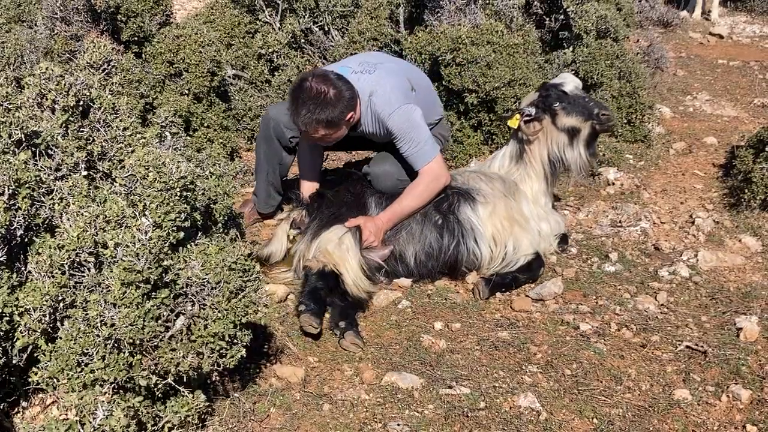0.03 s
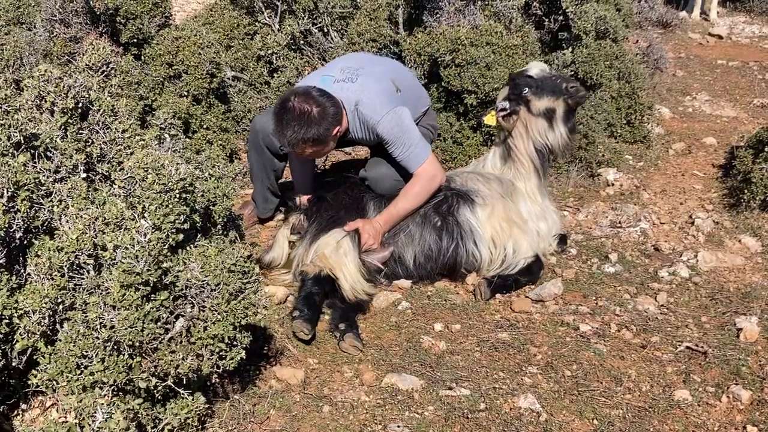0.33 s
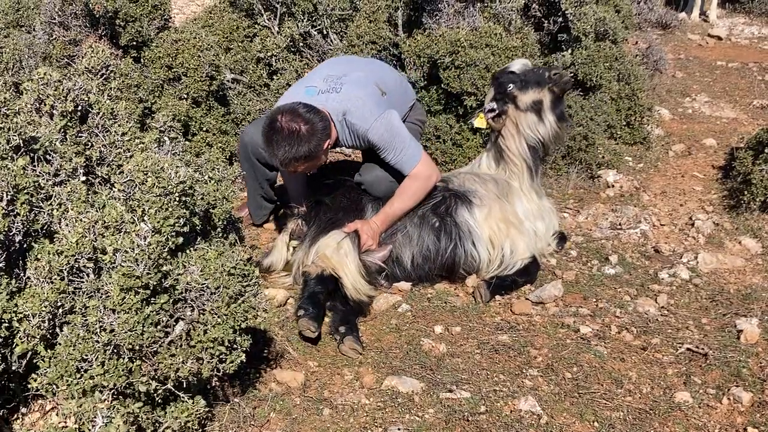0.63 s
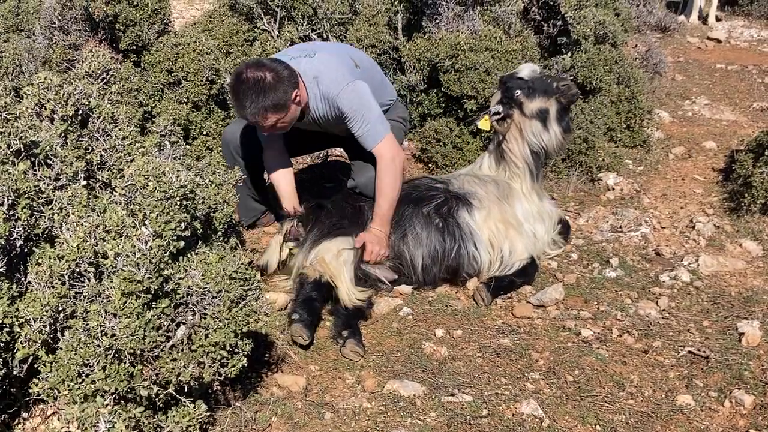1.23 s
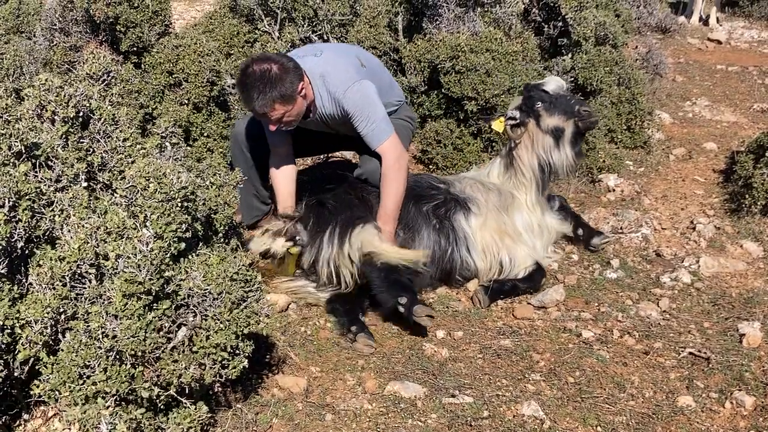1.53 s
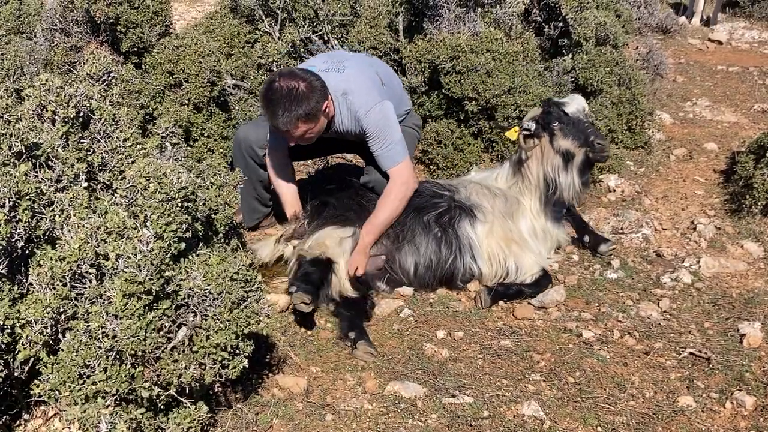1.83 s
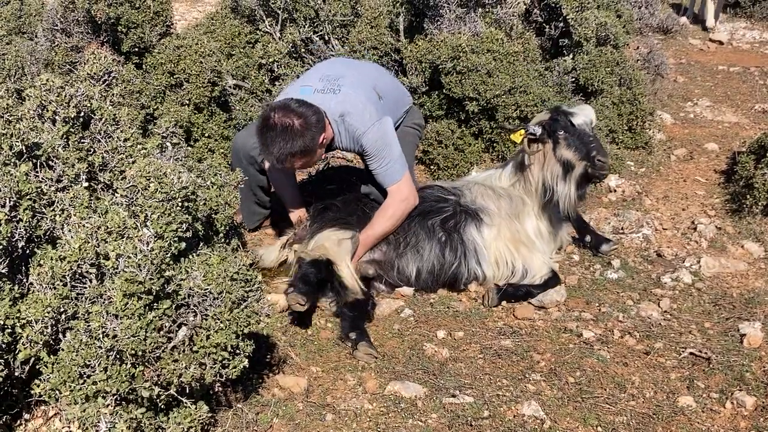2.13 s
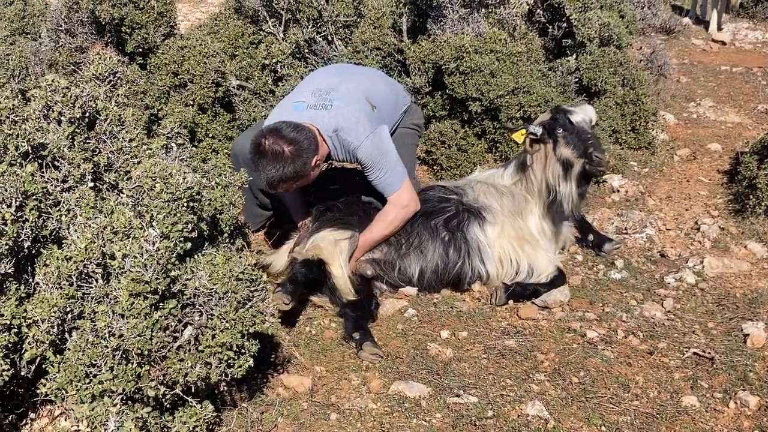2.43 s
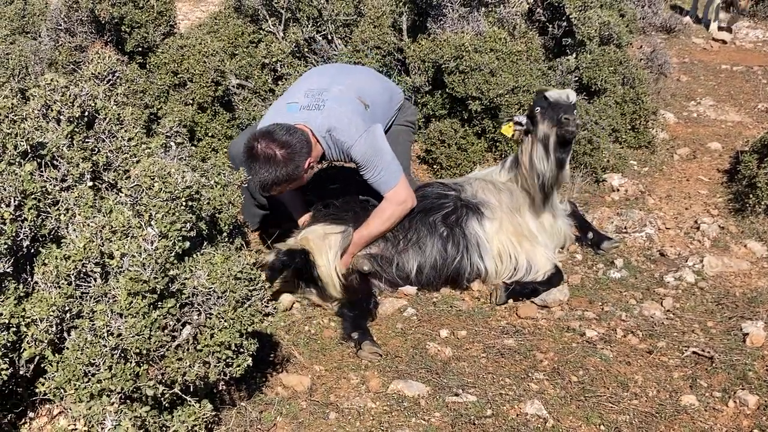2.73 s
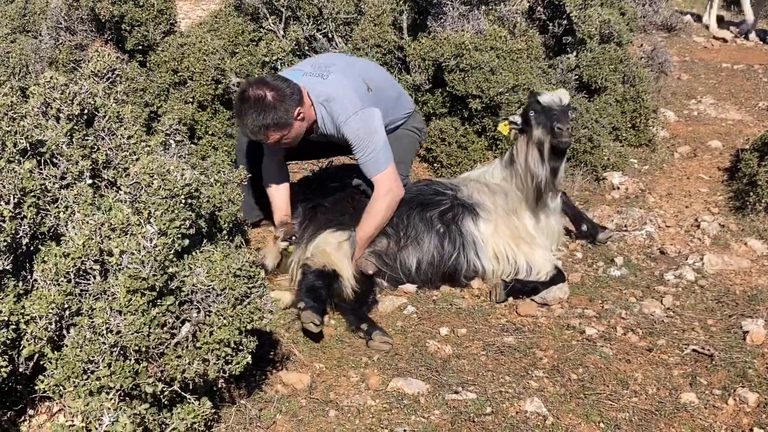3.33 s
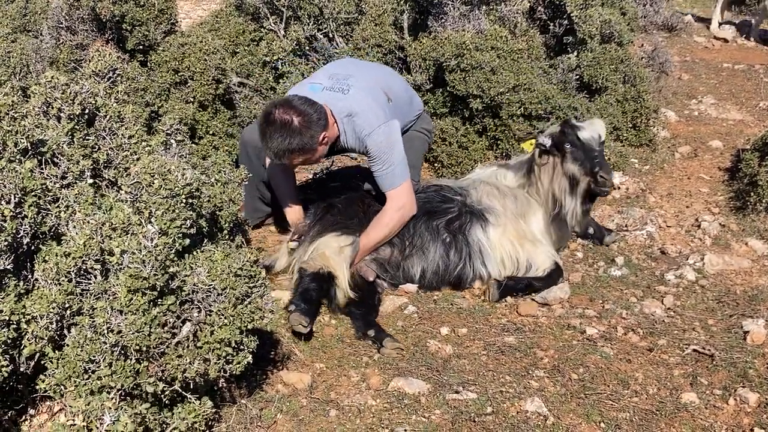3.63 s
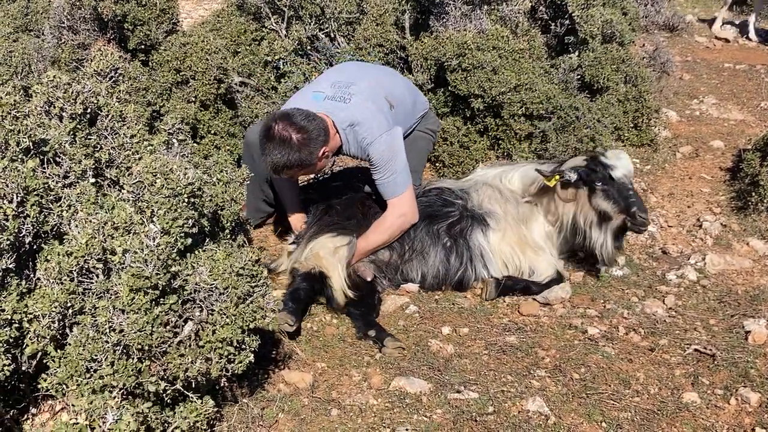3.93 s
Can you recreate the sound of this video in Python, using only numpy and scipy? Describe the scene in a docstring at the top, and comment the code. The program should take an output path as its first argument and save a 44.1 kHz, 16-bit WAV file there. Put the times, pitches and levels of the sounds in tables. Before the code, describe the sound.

Goat bleats come from the left in the open air, a thin high one first and a nearer, low, hoarse one later. Gusts of wind rumble on the microphone throughout, while grit scuffs softly and hair and clothes rustle faintly.

```python
"""A goat held on stony ground gives a low, buzzing bleat near a two-port stereo microphone, outdoors.
Before it comes a thin, high goat cry that trails off. Both are vocal-fold pulses ringing a throat,
left of centre, with a faint echo from ground and bushes. Wind buffets the microphone in low gusts;
grit scuffs, coat and clothes rustle in tiny grains, and a far bird chirps over quiet open air."""
import sys
import numpy as np
from scipy import signal
from scipy.fft import rfft, irfft
from scipy.io import wavfile
from scipy.ndimage import uniform_filter1d

SR = 44100
rng = np.random.default_rng(int(sys.argv[2]) if len(sys.argv) > 2 else 0)


def master_out(mix):
    """Clip the mix to full scale and print it as 16-bit PCM to the path in sys.argv[1]."""
    frames = np.transpose(np.atleast_2d(mix))
    ceiling = np.clip(frames, -1, 1)
    pcm = np.round(ceiling * 32767).astype(np.int16)
    wavfile.write(sys.argv[1], SR, pcm)


N = 176400
T = np.arange(N) / SR
HZ = np.fft.rfftfreq(N, 1 / SR)
TOP_HZ = 15700  # upper limit of the overtones and of the recorder


# Near goat: t/s, pitch/Hz, then level/dB of fundamental, lowest throat resonance, buzz and treble
BLEAT_CONTOUR = [(2.507, 188.2, -80, -83, -71, -90), (2.515, 184.2, -70, -66.5, -58.5, -76),
                 (2.58, 199.7, -51, -57, -53, -67), (2.62, 193, -62, -60, -60, -83),
                 (2.645, 202, -52, -58, -58.5, -92), (2.675, 229.2, -47, -49, -45.5, -76),
                 (2.708, 232.1, -37.5, -45.5, -38.5, -55.5), (2.74, 238.7, -33, -45, -38.5, -58),
                 (2.765, 243.9, -39.5, -46.5, -48, -60), (2.795, 239.3, -39, -46.5, -42.5, -64),
                 (2.82, 247.5, -38, -45.5, -39.5, -54.5), (2.842, 246.7, -33, -41.5, -36.5, -44),
                 (2.9, 258.8, -33.5, -42, -38, -44.5), (2.966, 271, -31.5, -40, -41.5, -48.5),
                 (3.004, 273.5, -34, -39.5, -46, -49), (3.084, 268.1, -34.5, -40.5, -47, -51.5),
                 (3.148, 261.6, -39.5, -45.5, -52.5, -56.5), (3.204, 243.2, -40, -47.5, -52.5, -59.5),
                 (3.224, 231.3, -45.5, -52, -60, -83), (3.266, 206, -72, -68, -99, -98)]
# Its hoarseness: t/s, roughness/0-1
BLEAT_HOARSENESS = [(2.63, 0.83), (2.7, 0.06), (3.19, .07), (3.23, 0.95)]
# Its throat resonances: short f/Hz, stretched f/Hz, width/Hz, short level/dB, stretched level/dB
BLEAT_FORMANTS = [(219, 232, 79, -9, -6), (489.5, 500.6, 39, -16.5, -14.5), (801, 777, 79, 8, -3.5),
                  (1630, 1535, 270, -34, -3), (2510, 2040, 160, -2.5, 2.5), (3130, 2900, 277, -1.5, 4),
                  (4186, 3500, 180, 6, 3.5), (4540, 4210, 215, 1.5, 3.5), (4850, 4930, 500, -0.5, -11.5),
                  (5600, 5300, 240, 0.5, -7), (7900, 7550, 50, -9, -8.5), (7400, 6750, 120, -45, -7),
                  (11080, 10800, 570, -0.5, -7), (12000, 11950, 227, -13, 2)]
# Its throat lengthening: t/s, stretch/0-1
THROAT_STRETCH = [(2.72, 0.062), (2.83, 0.51), (2.96, 0.94), (3.2, 0.95)]

def bleat():
    """Near goat: sharp pulses ring a throat whose resonances glide as it stretches; hoarse at each end."""
    drive, on = vocal_folds(BLEAT_CONTOUR, jitter=.0017, rough=curve(BLEAT_HOARSENESS))
    rasping = drive * amp(1.5 * wander(220)) + .25 * noise()  # drives the treble only
    stretch, out = curve(THROAT_STRETCH)[on], np.zeros(N)
    edges_hz = [140, 340, 1080, 4900, 16000]  # one band per level column
    for k, source in enumerate([drive, drive, drive, rasping]):
        voice = np.zeros(N)
        for i, (short_hz, long_hz, width_hz, short_db, long_db) in enumerate(BLEAT_FORMANTS):
            if edges_hz[k] < short_hz < edges_hz[k + 1]:
                gain = (-1) ** i * amp(short_db + (long_db - short_db) * stretch)
                formant_hz = short_hz + (long_hz - short_hz) * stretch
                voice[on] += gain * resonate(source[on], formant_hz, width_hz)
        voice = band(voice, edges_hz[k], edges_hz[k + 1])
        voice = voice / voice[on].std()
        running_rms = np.sqrt(abs(uniform_filter1d(voice ** 2, size=1800)) + 1e-2)
        out += voice / running_rms * amp(curve(BLEAT_CONTOUR, column=k + 2))
    return out * on


# Thin goat cry: t/s, pitch/Hz, low partials level/dB, treble level/dB
CRY_CONTOUR = [(0, 459.2, -52.5, -48.5), (.09, 451.3, -54, -49), (.26, 447, -53.5, -53.5),
               (.35, 438.4, -54.5, -53.5), (.405, 434.4, -57.5, -58.5), (.44, 418, -57, -62),
               (.462, 391, -61, -62.5), (.485, 360, -86, -91)]
# Throat response of the cry: f/Hz, level/dB
CRY_FORMANTS = [(900, 1), (1350, 5), (1600, 12.5), (1800, -14), (2240, -9), (2690, 5.5), (2950, -16),
                (3200, -27), (3590, -6.5), (4040, -0.5), (4930, -6), (5390, -5.5), (5840, -7.5),
                (6290, -13), (7180, -6), (7630, -20), (8530, -22.5), (10780, -22.5), (14820, -74)]

def cry():
    """A goat's thin held cry with almost no fundamental; it roughens as the pitch drops away."""
    rough = np.interp(T, [.43, .48], [.033, .51])
    drive, on = vocal_folds(CRY_CONTOUR, jitter=.0013, rough=rough)
    voice = colour(drive, CRY_FORMANTS)
    low, high = band(voice, 680, 3200), band(voice, 3200, 15000)
    low = low / low[on].std() * amp(curve(CRY_CONTOUR, column=2))
    high = high / high[on].std() * amp(curve(CRY_CONTOUR, column=3))
    return on * (low + high)


def vocal_folds(contour, jitter, rough):
    """A pulse and a puff of air per cycle, less regular when rough; also returns when the folds sound."""
    on = (T >= contour[0][0]) & (T <= contour[-1][0])
    pitch = curve(contour)
    pitch_wobble = jitter * rough / max(rough.min(), .02) * wander(93.8)
    cycles = np.cumsum(pitch * (1 + pitch_wobble)) / SR
    pulses, hz, t = 0, pitch[on], T[on]
    for k, (rate, phase) in enumerate(rng.random(size=(80, 2)), 1):
        # each overtone wavers at its own rate, up to 9 Hz
        waver_db = 4 * np.sqrt(k * hz / TOP_HZ) * np.sin(2 * np.pi * (9 * rate * t + phase))
        pulses = pulses + amp(waver_db) * np.cos(2 * np.pi * k * cycles[on]) * (k * hz < TOP_HZ)
    puffs = (0.58 + np.exp(-(cycles % 1) / 0.58)) * noise()
    shimmer = 1 + .2 * rough * wander(160)
    drive = np.zeros(N)
    drive[on] = unit(pulses) * shimmer[on] + (rough * unit(puffs))[on]
    return drive, on


def scrub_echo(x, level_db=-12, t60_s=.25):
    """Ground and bushes around the goats scatter a faint, short echo back to the microphone."""
    t = T[:SR // 2]
    tail = rng.standard_normal((2, len(t))) * amp(-60 * t / t60_s) * (t > .002)
    tail = tail / np.linalg.norm(tail[0])
    scattered = band(x, 650, 6000)
    return amp(level_db) * signal.fftconvolve(scattered[None], tail, axes=1)[:, :N]


# Gusts on the microphone: t/s, level/dB
WIND_GUSTS = [(0, -44.5), (.11, -37.5), (.19, -57), (.25, -55), (.29, -37), (.39, -62), (.5, -45.5),
              (.58, -53.5), (.7, -37), (.85, -53), (.95, -40), (1.06, -61.5), (1.1, -52.5), (1.14, -35.5),
              (1.23, -49.5), (1.32, -42), (1.45, -55), (1.6, -60), (1.67, -45.5), (1.88, -41.5),
              (2.03, -36), (2.14, -35.5), (2.22, -54), (2.4, -45), (2.48, -46.5), (2.59, -35.5),
              (2.72, -48), (2.88, -47.5), (2.96, -30), (3.06, -49), (3.39, -52), (3.45, -37.5),
              (3.55, -40.5), (3.6, -33.5), (3.68, -34), (3.78, -27.5), (3.88, -33.5), (4, -54.5)]
# Sharp buffets on the microphone: t/s, peak level/dB, f/Hz
WIND_BUFFETS = [(0.676, -34.5, 105), (1.259, -28.5, 66), (1.299, -37, 122), (1.651, -34, 70),
                (1.922, -23, 85), (2.02, -24.5, 81), (2.107, -38, 127), (2.463, -28.5, 83.4),
                (2.565, -33.5, 61.6), (3.573, -23.5, 87), (3.609, -22, 86.6), (3.69, -25.5, 122),
                (3.732, -17, 101), (3.796, -25, 91.3)]
# Low turbulence: f/Hz, level/dB
RUMBLE_SPECTRUM = [(15, -64), (30, -12), (55, 10), (100, -1.5), (160, -18), (270, -39.5), (420, -54),
                   (900, -80.5)]
# Brighter eddies: f/Hz, level/dB
EDDY_SPECTRUM = [(80, -13.5), (150, 7), (250, -13), (420, -33), (900, -70)]

def wind(buffet_rise_s=.00924, left_lag_s=.0002):
    """Turbulence on the microphone, right port first; strong gusts and buffets shed brighter eddies."""
    rumble = unit(colour(noise(), RUMBLE_SPECTRUM))
    running_power = uniform_filter1d(uniform_filter1d(rumble ** 2, size=1500), size=1000)
    gust = amp(curve(WIND_GUSTS))
    out = rumble / np.sqrt(running_power) * gust
    eddy_gain = amp(-37.5) * (gust / gust.max()) ** 1.76
    for start, db, hz in WIND_BUFFETS:
        t = np.maximum(T - start, 0)
        push = amp(db) * (t / buffet_rise_s * np.exp(1 - t / buffet_rise_s)) ** 2
        out += push * np.cos(2 * np.pi * hz * (t - buffet_rise_s))
        eddy_gain += amp(-14) * push
    out += eddy_gain * unit(colour(noise(), EDDY_SPECTRUM))
    return np.array([np.interp(T - left_lag_s, T, out), out])


# Scuffs on the stony soil: t/s, length/s, level/dB
SOIL_SCUFFS = [(0.475, 0.17, -56.5), (0.698, 0.12, -66), (0.784, 0.019, -54.5), (0.921, 0.11, -54.5),
               (0.977, 0.052, -57), (1.722, 0.053, -60), (2.274, 0.15, -66)]
# Dull tone of that soil: f/Hz, level/dB
SOIL_SPECTRUM = [(200, 12.5), (500, -11), (800, 5.5), (1050, -2.5), (1700, -5), (2300, -18), (4400, -19.5),
                 (5700, -35), (8300, -22.5), (15000, -30)]
# Dry brushes of hoof and sleeve: t/s, length/s, level/dB
DRY_BRUSHES = [(.92, .08, -76.5), (1.21, 0.051, -72.5), (1.725, 0.044, -64.5)]
# Snaps of grit: t/s, tick level/dB, knock level/dB
GRIT_SNAPS = [(.519, -48.5, -54), (.674, -50.5, -43.5), (0.753, -77, -62), (1.291, -55, -79),
              (1.31, -57, -75), (1.616, -83, -63), (2.051, -54.5, -91), (3.318, -82, -45),
              (3.579, -56, -69), (3.596, -58, -73)]

def ground(snap_decay_s=.0042):
    """Stony ground by the goat: dull grainy scuffs, dry brushes and short snaps of grit."""
    dull_gain = strokes(SOIL_SCUFFS) * amp(0.5 * wander(97))
    tick_gain = np.zeros(N)
    grit = noise() * rng.exponential(1, N)
    for start, tick_db, knock_db in GRIT_SNAPS:
        fade = (T >= start) * np.exp(-abs(T - start) / snap_decay_s)
        tick_gain += amp(tick_db) * fade
        dull_gain += amp(knock_db) * fade
    brushes = strokes(DRY_BRUSHES) * unit(band(grit, 1500, 6000))
    soil = dull_gain * unit(colour(grit, SOIL_SPECTRUM))
    ticks = tick_gain * unit(colour(noise(), RUSTLE_SPECTRUM))
    return soil + brushes + ticks


def strokes(table):
    """Gain of rubbing strokes that swell quickly and ease off."""
    return sum(amp(db) * np.sin(np.pi * np.clip((T - start) / length, 0, 1) ** 0.6)
               for start, length, db in table)


# Coat and clothes moving near the microphone: t/s, level/dB
RUSTLE_LEVEL = [(0, -75), (.47, -77), (.53, -66), (.62, -74), (.87, -83), (.97, -78.5), (1.06, -83),
                (1.3, -70), (1.38, -77.5), (1.5, -65.5), (1.62, -65.5), (1.71, -58.5), (1.85, -71),
                (2.07, -66.5), (2.25, -70.5), (2.35, -69), (2.42, -78.5), (2.5, -71), (3.27, -72),
                (3.46, -60.5), (3.56, -67), (3.76, -69.5), (3.86, -73.5), (4, -77.5)]
# Bright tone of the rustle, shared by the grit ticks: f/Hz, level/dB
RUSTLE_SPECTRUM = [(200, -28), (500, -17.5), (900, -21), (2200, -7), (3500, -4.5), (4600, 2), (5700, -6),
                   (7900, 2.5), (10000, 12), (11800, 5.5), (13200, 3), (15500, -16.5)]

def rustle(grains_per_s=2500):
    """Hair and cloth rub in dense tiny grains over a hiss; the level flickers slightly."""
    grains = (rng.random(N) < grains_per_s / SR) * noise()
    grains *= amp(3 * np.minimum(rng.exponential(1, N), 4))  # a few stand out, by up to 12 dB
    friction = unit(colour(.6 * unit(grains) + .4 * noise(), RUSTLE_SPECTRUM))
    flicker_db = wander(5)
    return friction * amp(curve(RUSTLE_LEVEL) + flicker_db)


# Far bird, middle of each chirp: t/s
CHIRP_TIMES = [1.707, 1.817, 1.856, 1.93, 1.959, 2.059, 2.092, 2.193, 2.225, 2.324, 2.36, 2.471]

def bird(pitch_hz=4680, length_s=.037, level_db=-68.5):
    """A bird far from the microphone: faint, raspy, slightly falling chirps, mostly in pairs."""
    out, rasp = np.zeros(N), 0.0627 * wander(806)
    for middle in CHIRP_TIMES:
        position = np.clip((T - middle) / length_s, -.5, .5)
        hz = pitch_hz * (1 - .04 * position + rasp)
        out += np.cos(np.pi * position) * np.sin(2 * np.pi * np.cumsum(hz) / SR)
    return amp(level_db) * out


# Open-air background: f/Hz, level/dB
AIR_SPECTRUM = [(30, -13.5), (150, -16.5), (400, -23), (1000, -29.5), (2500, -35.5), (4600, -37.5),
                (6000, -39.5), (11000, -54), (15000, -38)]

def open_air(level_db=-73.5):
    """The quiet, steady hush of the place."""
    return amp(level_db) * unit(colour(noise(), AIR_SPECTRUM))


# Phase between the microphone ports: f/Hz, left lead/rad
PORT_PHASE = [(0, 0), (400, 0), (1800, .5), (2250, 1.6), (3200, 1.4), (3800, .3), (4750, .1), (5250, 2.7),
              (6300, .3), (6900, 0), (9200, -3.14), (11500, -6.28), (13800, -9.42), (15700, -12.5)]

def microphone(x, balance):
    """Two ports hear a source with different phase and level; the bass is alike in both."""
    above_bass = np.clip(HZ / 350 - 1, 0, 1)
    left_gain = amp(above_bass * spectrum_at(balance, HZ) / 2)
    right_gain = np.exp(-1j * np.interp(HZ, *np.transpose(PORT_PHASE))) / left_gain
    spectrum = rfft(x) / np.sqrt((left_gain ** 2 + left_gain ** -2) / 2)  # keeps the total power
    return irfft(np.array([spectrum * left_gain, spectrum * right_gain]), N)


def amp(db):
    """Decibels to gain."""
    return 10 ** (np.asarray(db) / 20)


def unit(x):
    """Scales to rms 1."""
    return x / np.sqrt(np.mean(x ** 2) + 1e-20)


def noise():
    """White noise."""
    return rng.standard_normal(N)


def wander(rate_hz):
    """Random drift of rms 1, mostly slower than rate_hz."""
    return unit(irfft(rfft(noise()) * np.exp(-(HZ / rate_hz) ** 2), N))


def curve(table, column=1):
    """One column of a time table at every sample."""
    table = np.array(table)
    return np.interp(T, table[:, 0], table[:, column])


def spectrum_at(points, hz):
    """Interpolates a spectrum table on a log-frequency axis."""
    f, db = np.transpose(points)
    return np.interp(np.log(hz + 1), np.log(f + 1), db)


def colour(x, points):
    """Minimum-phase filter with the given spectrum."""
    log_gain = np.log(amp(spectrum_at(points, abs(np.fft.fftfreq(4096, 1 / SR)))))
    taps = np.fft.ifft(np.exp(np.conj(signal.hilbert(log_gain)))).real
    return signal.oaconvolve(x, taps[:len(taps) // 2])[:N]


def band(x, lo_hz, hi_hz):
    """Steep band-pass."""
    return irfft(rfft(x) / (1 + (lo_hz / (HZ + 1)) ** 16) / (1 + (HZ / hi_hz) ** 16), N)


def resonate(x, hz, width_hz):
    """A resonance of gain 1 that follows the curve hz."""
    carrier = np.exp(2j * np.pi * np.cumsum(hz) / SR)
    pole = np.exp(-np.pi * width_hz / SR)
    return 2 * (carrier * signal.lfilter([1 - pole], [1, -pole], x / carrier)).real


# Bleat, cry and surroundings as placed at the microphone: f/Hz, left minus right level/dB
BLEAT_BALANCE = [(300, 20), (750, 3), (1300, 2.5), (3200, 6.5), (4200, 0.5), (6000, 0.5)]
CRY_BALANCE = [(300, 18), (1300, 11), (4400, 1), (7000, 0.5)]
SURROUNDINGS_BALANCE = [(300, 4.5), (1300, 8), (2400, 1.5), (4400, 8.5), (8000, -0.5)]

def scene():
    """Goats and their surroundings to the left of the microphone, wind directly on it."""
    thin, low, air = cry(), bleat(), open_air()
    goats = microphone(low, BLEAT_BALANCE) + microphone(thin, CRY_BALANCE)
    echo = scrub_echo(low + 0.84 * thin)
    surroundings = microphone(rustle() + ground() + bird() + air, SURROUNDINGS_BALANCE)
    return goats + echo + surroundings + wind()


def record(dry):
    """The recorder's band limit."""
    low_pass = signal.firwin(511, TOP_HZ, window=("kaiser", 9), fs=SR)
    return signal.oaconvolve(dry, low_pass[None], "same")


dry = scene()
out = record(dry)
master_out(out)
```